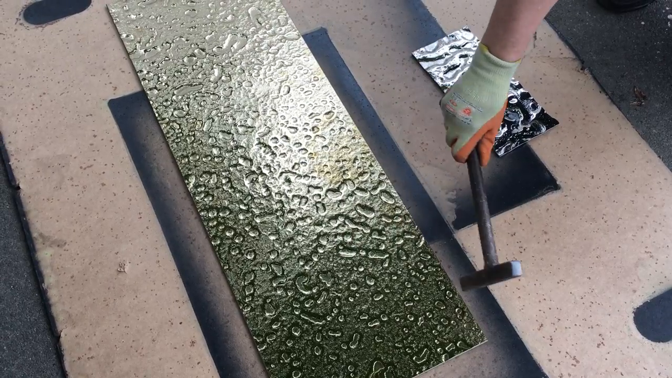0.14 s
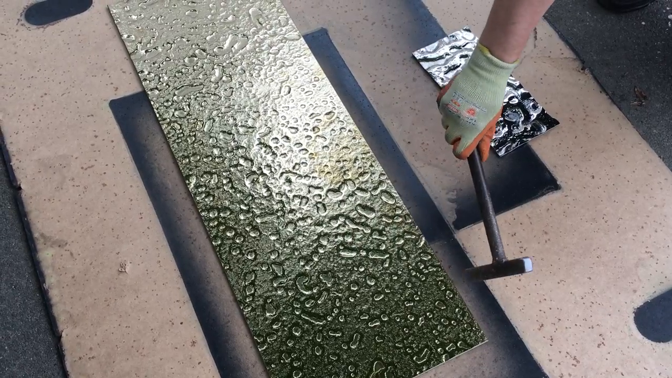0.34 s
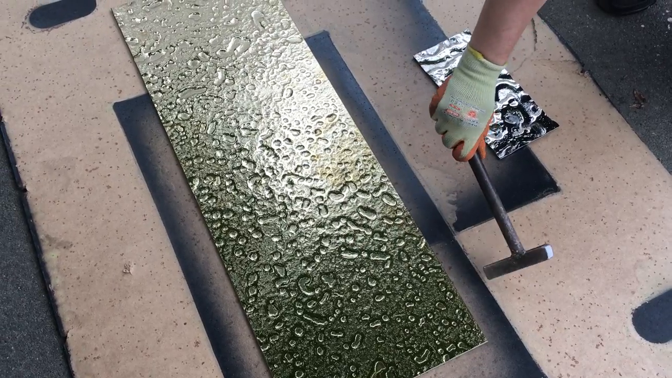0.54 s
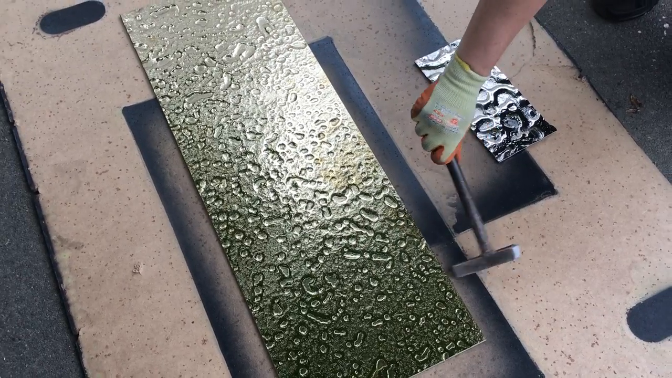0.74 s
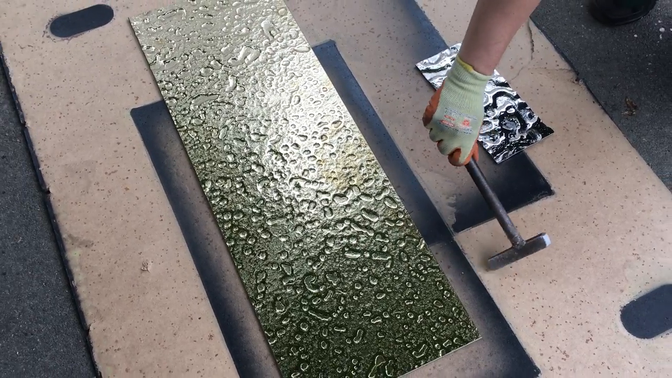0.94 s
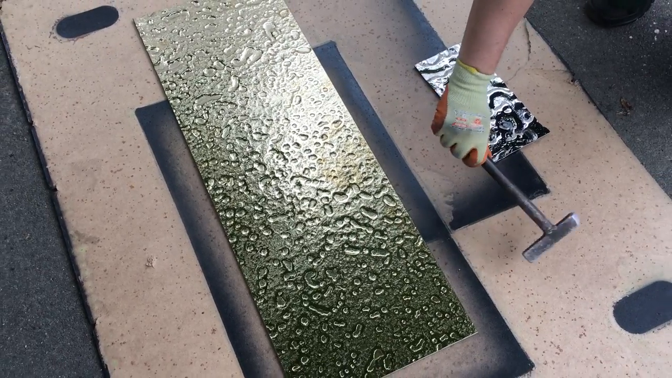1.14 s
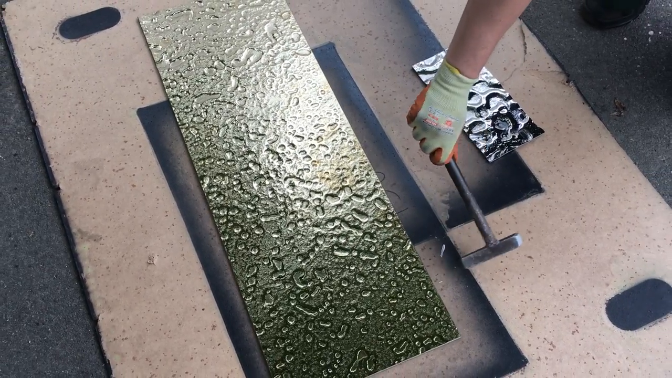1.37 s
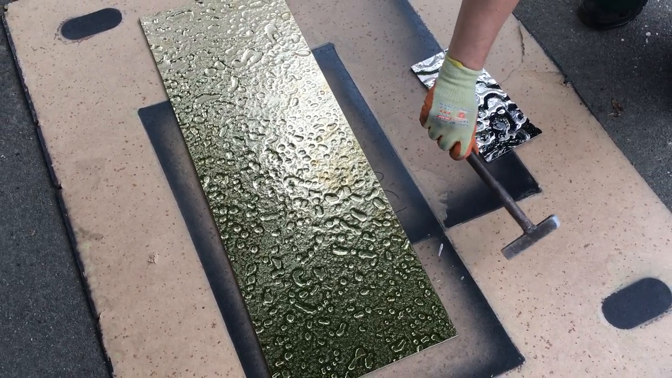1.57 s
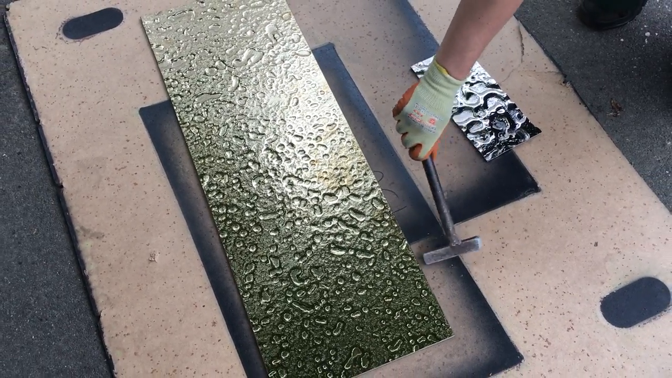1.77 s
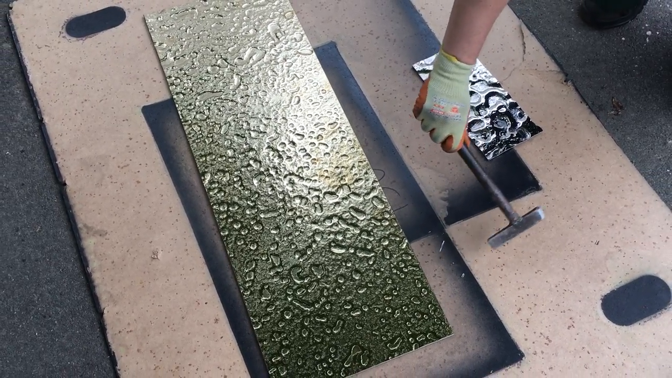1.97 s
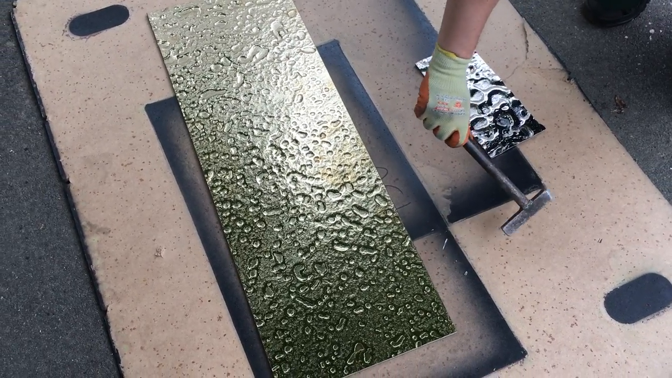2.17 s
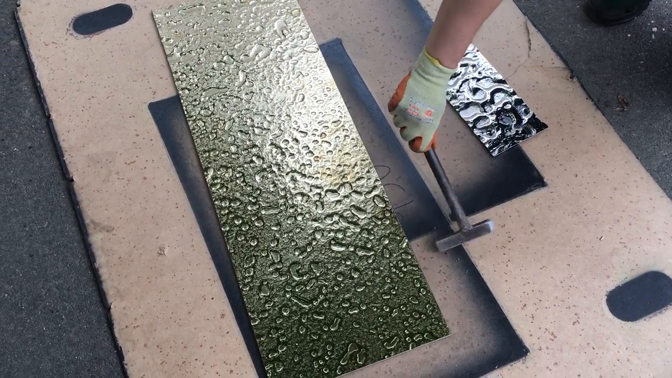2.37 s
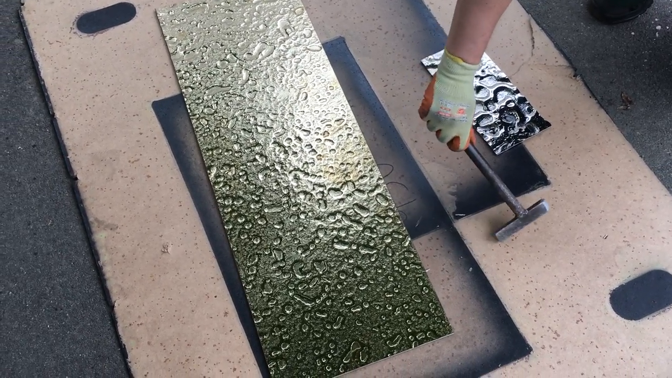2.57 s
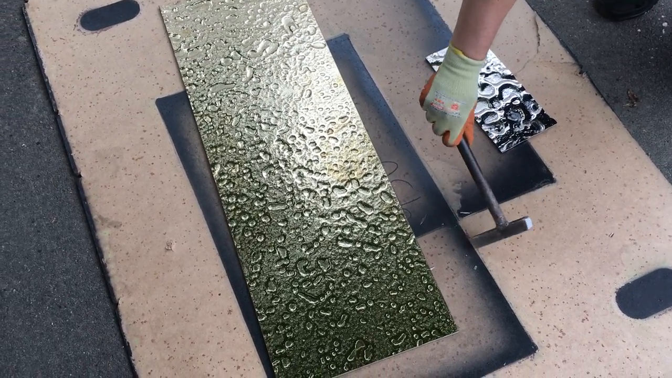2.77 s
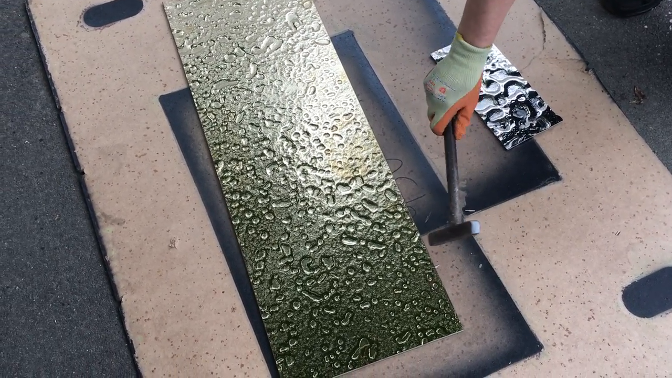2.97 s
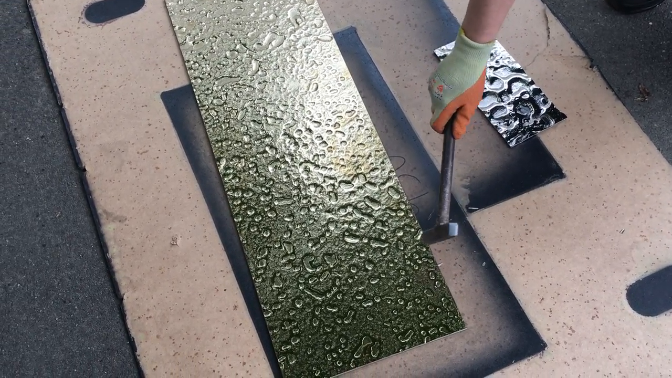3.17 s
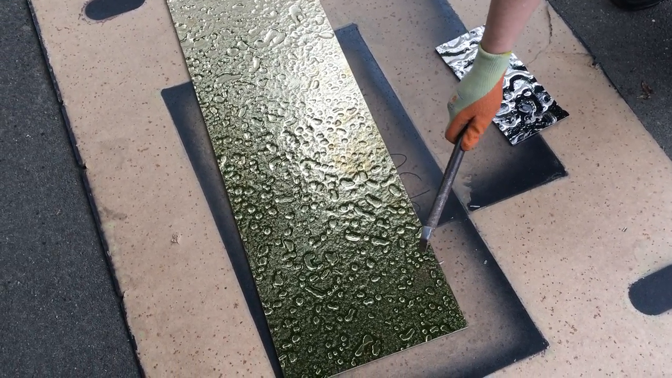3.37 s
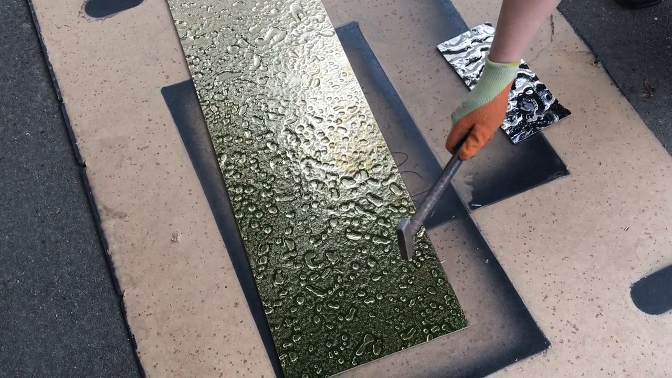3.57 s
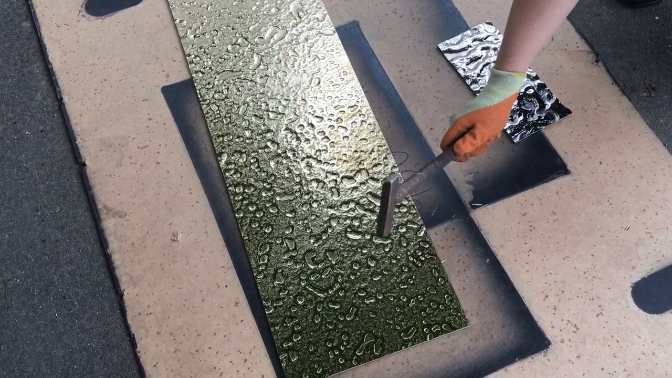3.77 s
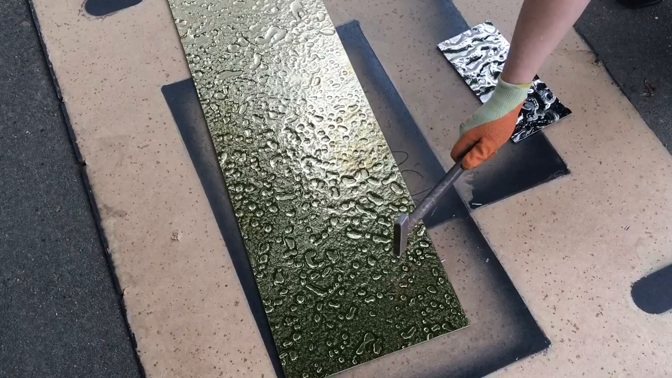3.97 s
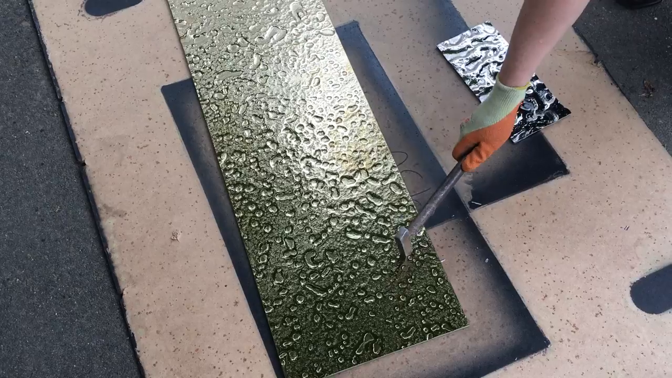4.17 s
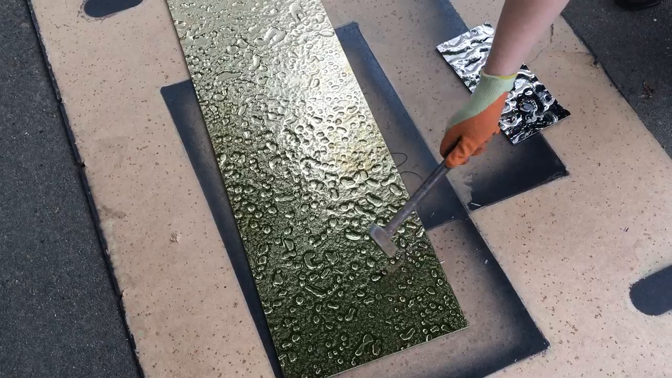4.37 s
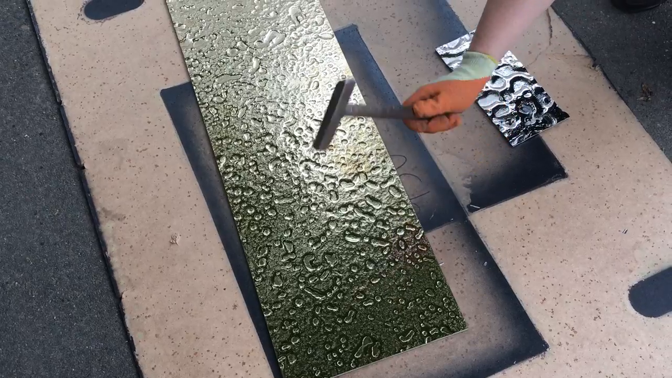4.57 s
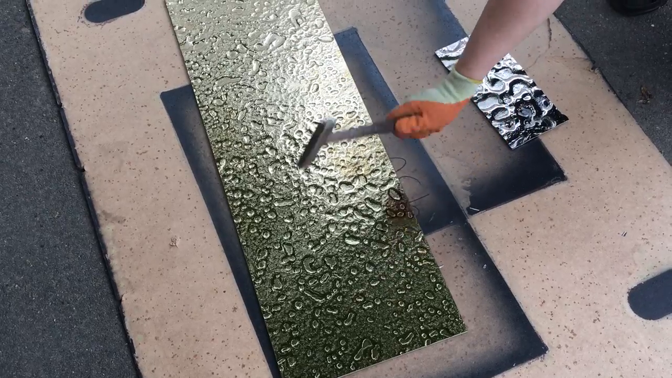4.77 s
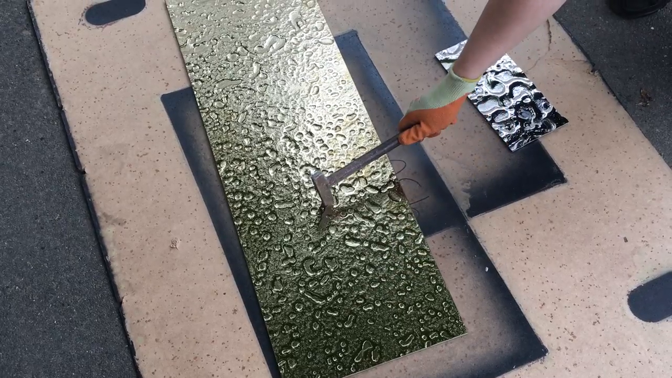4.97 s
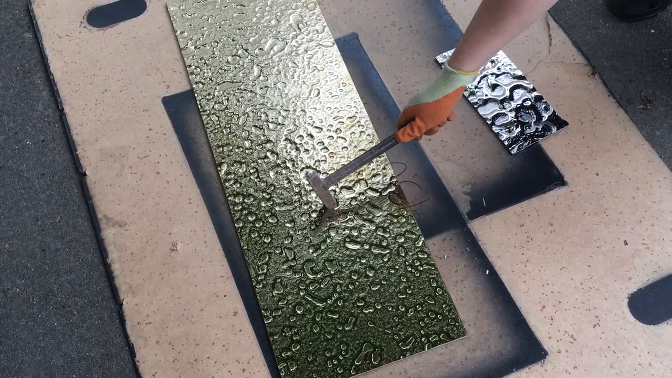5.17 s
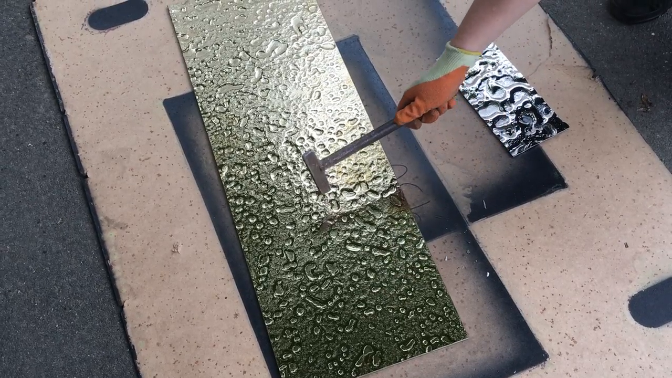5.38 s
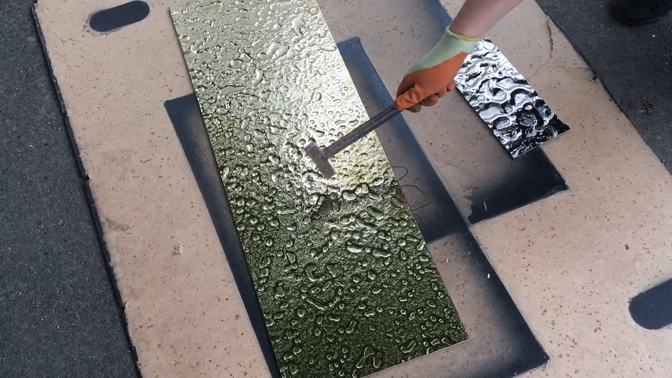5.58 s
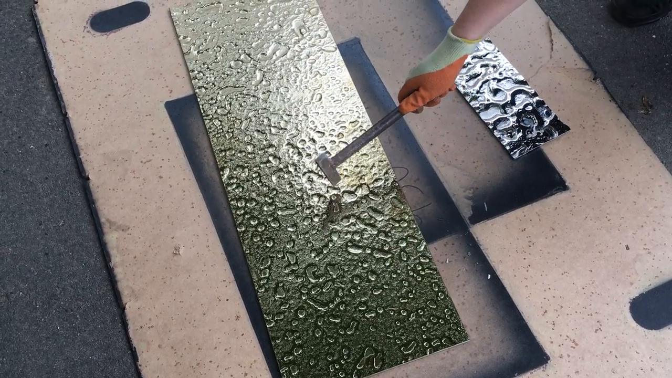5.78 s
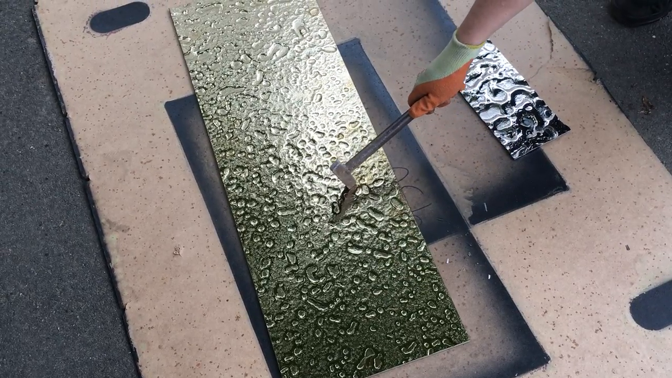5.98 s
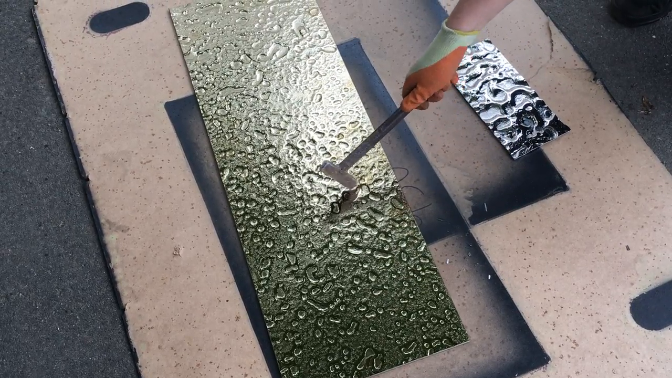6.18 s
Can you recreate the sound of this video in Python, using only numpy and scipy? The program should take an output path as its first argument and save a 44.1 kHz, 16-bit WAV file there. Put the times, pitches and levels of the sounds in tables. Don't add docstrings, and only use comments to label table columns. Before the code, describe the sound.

Seven hard hammer blows on glass in a yard, bright at first, then dull and crunchy, with chips ticking and a far engine humming.

```python
import sys
import numpy as np
from scipy import signal
from scipy.fft import rfft, irfft
from scipy.io import wavfile
from scipy.ndimage import uniform_filter1d, map_coordinates

SR = 44100
rng = np.random.default_rng(int(sys.argv[2]) if len(sys.argv) > 2 else 0)


def persist_wave(psi):
    counts = np.round(np.clip(psi, -1, 1) * 32767).astype(np.int16)
    wavfile.write(sys.argv[1], SR, np.atleast_2d(counts).T)


def boost(x):
    u = np.asarray(x, float) / 20
    return 10 ** u


N = 274302
T = np.arange(SR * 7 // 10) / SR

BLOW_S = [
    .8355,
    1.3222,
    1.8375,
    2.3922,
    4.1203,
    4.8978,
    5.9432,
]
# (yard under the blow [dB], far echo [dB], treble of the far echo [dB], gain dip [dB])
AFTER = [(-19, -44, -51, 4.5), (-15.5, -52, -56, 6), (-14.5, -52, -59.5, 4.5), (-15, -44.5, -45.5, 1.5),
         (-19.5, -72.5, -44.5, 6.5), (-26.5, -62, -50.5, 23), (-24, -48.5, -55, 4)]
# (frequency [Hz], level per Hz [dB])
FACE = [(160, -24.5), (280, 13), (1470, 1), (1990, -2.5), (3800, -13.5), (4810, -13.5), (6410, -9.5),
        (6980, -16), (9310, -19), (9790, -25), (12200, -25.5), (16000, -38.5)]
ECHO_T60, TREBLE_T60 = 0.59, 0.76
TREBLE_DIPS = 0.41


def unit(x):
    return x / np.sqrt(np.mean(x ** 2) + 1e-20)


def along(points, hz):
    f, v = np.transpose(points)
    return np.interp(np.log(hz + 1), np.log(f + 1), v)


def wobble(rate, size=N):
    knots = rng.standard_normal(int(size * rate / SR) + 4)
    return map_coordinates(knots, [np.arange(size) * rate / SR], order=1)


def noise(size, gain, peaky_db=0):
    mode_gap_hz, clear_from_hz, depth = 35, 3000, 1.6
    f = np.fft.rfftfreq(size, 1 / SR)
    crowd = np.minimum(wobble(SR * SR / size / mode_gap_hz, len(f)), 1.5) * f / (f + clear_from_hz)
    peaks = boost(peaky_db * (.5 * rng.standard_normal(len(f)) + depth * crowd))
    return unit(irfft(rfft(rng.standard_normal(size)) * peaks * gain(f), size))


def band(hz, width_hz):
    return lambda f: (f * width_hz / np.abs(hz * hz - f * f + 1j * f * width_hz)) ** 2


def dying(gain, decays, hold, scale, peaky_db):
    hz, t, z = signal.stft(noise(len(T), gain, peaky_db), SR, nperseg=128)
    fall = np.maximum(t - hold, 0) / (scale * along(decays, hz)[:, None])
    return signal.istft(z * boost(-60 * fall), SR, nperseg=128)[1][:len(T)]


def add(track, s, piece):
    place = track[round(s * SR):][:len(piece)]
    place += piece[:len(place)]


def fade(t60, attack=1e-5):
    return boost(-60 * T / max(t60, 1e-3)) * (1 - np.exp(-T / attack))


def thin(x, hz):
    return signal.sosfilt(signal.butter(4, hz, "high", fs=SR, output="sos"), x)


def dips():
    opening_db, fall_s, hold_s, recover_db_per_s = 13.5, 0.064, 0.25, 26.5
    t = np.arange(N) / SR
    dip_db = np.maximum(opening_db - recover_db_per_s * t, 0)
    for s, after in zip(BLOW_S, AFTER):
        back_db = recover_db_per_s * np.maximum(t - s - hold_s, 0)
        dip_db = np.maximum(dip_db, after[3] * np.clip((t - s) / fall_s, 0, 1) - back_db)
    return dip_db


def swollen(db, t60, column):
    delay_s, rise_s = 0.043, .04
    power = boost(2 * db)
    for s, after in zip(BLOW_S, AFTER):
        age = np.maximum(np.arange(N) / SR - s - delay_s, 0)
        echo = boost(after[column] - 60 * age / t60) * (1 - np.exp(-age / rise_s))
        power = power + echo ** 2
    return np.sqrt(power)


def nearness():
    # (time [s], level [dB])
    near = [(0, -2.5), (.8, -3), (1.6, 2.5), (2.5, 1), (3.3, 0.3), (4, -0.1), (4.75, 2), (5.5, 0.5),
            (6.22, 0)]
    s, db = np.transpose(near)
    return np.interp(np.arange(N) / SR, s, db)


def hiss():
    # (frequency [Hz], level per Hz [dB])
    hiss_colour = [(2500, -25), (3200, -0.5), (5000, -6.5), (7000, -12.5), (9500, -17.5), (10500, -22.5),
                   (15500, -24), (16500, -53.5)]
    level_db = -67.5 + 1.3 * nearness() - TREBLE_DIPS * dips()
    gain = swollen(level_db, TREBLE_T60, column=2)
    return boost(-3.5) * gain * noise(N, lambda f: boost(along(hiss_colour, f)))


def traffic():
    # (frequency [Hz], level per Hz [dB])
    traffic_colour = [(180, -29.5), (300, -5), (345, -8), (400, -16.5), (502, -13), (618, -8.5), (832, -12),
                      (1200, -13.5), (1820, -17), (3200, -26), (4160, -56.5), (7040, -120)]
    rush = noise(N, lambda f: boost(along(traffic_colour, f))) * boost(0.27 * wobble(6.8))
    level_db = -57.5 + 1.4 * nearness() - TREBLE_DIPS * dips()
    return rush * swollen(level_db, ECHO_T60, column=1)


def engine():
    # (frequency [Hz], level per Hz [dB])
    engine_colour = [(12, -48.5), (20, -24.5), (49, -2.5), (86, -0.5), (113, 0.5), (131, -11.5), (157, -9),
                     (214, -18.5), (338, -14.5), (390, -30.5), (450, -32.5), (580, -59.5), (990, -120)]
    # (frequency [Hz], width [Hz], level [dB])
    hum = [(122.76, 5.4, -5.5), (368, 7.6, -26.5), (579, 76, -21)]
    orders = sum(boost(db) * noise(N, band(hz, width_hz)) for hz, width_hz, db in hum)
    rumble = noise(N, lambda f: boost(along(engine_colour, f))) * boost(1.5 * wobble(7))
    return boost(-44 + nearness() - dips()) * (rumble + orders)


def squeal(grips, hz):
    bite_db_per_s, let_go_db_per_s, wander_hz = 650, 520, 5
    t = np.arange(N) / SR
    level_db = np.full(N, -140.)
    for s, length, db, change_db in grips:
        held = db + change_db * np.clip((t - s) / length, 0, 1)
        bite = bite_db_per_s * np.maximum(s - t, 0)
        let_go = let_go_db_per_s * np.maximum(t - s - length, 0)
        level_db = np.maximum(level_db, held - bite - let_go)
    pitch = hz + wander_hz * wobble(12)
    tone = np.sin(2 * np.pi * np.cumsum(pitch) / SR)
    return np.sqrt(2) * boost(level_db + 1.3 * wobble(30)) * tone


def brakes():
    # (start [s], length [s], level [dB], change over the grip [dB])
    first_grips = [(.15, .3, -85.5, -7), (.93, 0.072, -61, -14), (1.06, 0.2, -74.5, 1),
                   (1.345, 0.036, -40.5, -3), (1.42, 0.038, -38.5, -0.5), (1.47, 0.068, -46, 3),
                   (1.545, 0.15, -41, -5.5), (1.71, 0.088, -50.5, -4.5), (1.9, 0.14, -46.5, 3),
                   (2.06, 0.1, -43, 4), (2.17, 0.15, -42.5, -13), (2.345, 0.023, -57.5, -6),
                   (2.43, 0.046, -40.5, 4), (2.505, 0.029, -37, 0), (2.56, 0.09, -50.5, -4),
                   (2.66, 0.081, -48.5, -4), (2.77, 0.037, -54.5, 2), (2.845, 0.059, -48, 0.5),
                   (2.93, 0.3, -45, -18.5)]
    # (start [s], length [s], level [dB], change over the grip [dB])
    second_grips = [(2.65, 0.1, -74.5, 3), (2.925, 0.29, -73, 0), (3.34, 0.062, -78, -1.5),
                    (3.45, 0.24, -66, -8), (3.78, 0.062, -78, 3)]
    return squeal(first_grips, 5660) + squeal(second_grips, 4290)


def chips():
    # (time [s], level [dB], centre [Hz], width [Hz], t60 [s])
    ticks = [(1.5323, -58, 12900, 5000, 0.046), (1.6615, -59.5, 11800, 6000, 0.054),
             (1.723, -64, 11000, 6000, .04), (2.0487, -62, 8360, 3000, .04),
             (2.707, -50, 10700, 8000, 0.03), (2.765, -62, 8000, 8050, 0.034),
             (2.86, -74, 12000, 6070, 0.045), (2.9685, -58, 11700, 8050, .03),
             (3.0264, -55, 10600, 6000, 0.025), (3.0702, -56, 8950, 6000, 0.097),
             (3.1545, -63, 10800, 6000, .03), (3.219, -63, 12100, 5010, .03),
             (4.355, -58, 8800, 7850, 0.093), (4.6757, -45, 8500, 12100, 0.092),
             (4.675, -44.5, 2250, 1990, 0.059), (4.795, -55.5, 3970, 5900, 0.042),
             (4.865, -55, 5880, 5030, .03), (5.154, -66.5, 11200, 5100, 0.056),
             (5.89, -70, 11000, 5980, 0.024), (6.161, -69, 7000, 6080, 0.028),
             (6.1984, -60.5, 7500, 6960, 0.025)]
    out = np.zeros(N)
    for s, db, hz, width_hz, t60 in ticks:
        add(out, s, boost(db) * fade(t60, .0004) * noise(len(T), band(hz, width_hz), peaky_db=2.0))
    return out


def faint_rings():
    # (time [s], level [dB], frequency [Hz], t60 [s])
    shard = [(2.707, -63, 9420, .2), (3.027, -68, 9420, .18), (3.156, -68, 9420, .4),
             (3.22, -78, 11000, .15)]
    # (time [s], level [dB], frequency [Hz], t60 [s])
    pairs = [(2.43, -57, 2942, 1.1), (2.43, -61, 2953, 1.1), (2.43, -60, 3612, 1.0), (2.43, -64, 3621, 1.0)]
    out = np.zeros(N)
    for s, db, hz, t60 in shard + pairs:
        add(out, s, boost(db) * fade(t60) * np.sin(2 * np.pi * hz * T))
    return out


def rustles():
    rustle_s = [.784, 4.19, 4.3, 5.105, 5.105, 5.195, 5.28, 5.435, 6.0, 6.022, 6.06]
    # (length [s], level [dB], centre [Hz], width [Hz])
    scrapes = [(0.216, -46.5, 1300, 1700), (0.66, -62.5, 1940, 350), (0.34, -67, 5500, 3300),
               (0.18, -54, 1100, 2800), (0.32, -62, 3700, 5700), (.2, -55.5, 970, 2000),
               (0.34, -69.5, 3100, 3300), (.11, -56.5, 1040, 1200), (0.17, -63, 5200, 5000),
               (0.09, -51, 1100, 3500), (.12, -55, 800, 900)]
    out = np.zeros(N)
    for s, (length, db, hz, width_hz) in zip(rustle_s, scrapes):
        swell = np.sin(np.pi * np.clip(T / length, 0, 1) ** .45) ** 2
        grain = boost(db + 4.2 * np.clip(wobble(220, len(T)), -2, 1.5))
        rub = noise(len(T), lambda f: band(hz, width_hz)(f) / (1 + (f / 7500) ** 4))
        add(out, s, grain * swell * rub)
    return out


def bounces():
    # (time [s], level [dB], centre [Hz], width [Hz], t60 [s])
    knocks_around = [(4.141, -9.5, 2270, 1210, 0.034), (4.166, -22, 1870, 1800, 0.1),
                     (4.221, -32.5, 1900, 1510, 0.023), (4.923, -17.5, 3200, 1400, 0.029),
                     (4.934, -6, 2220, 880, 0.021), (4.956, -32, 2063, 2500, 0.042),
                     (.923, -37.5, 1400, 889, 0.1), (2.5, -47, 1700, 2400, 0.067),
                     (2.7595, -46, 680, 500, 0.13), (2.47, -36, 1400, 120, .1), (2.528, -39, 900, 1800, .04),
                     (1.375, -36, 2300, 500, .05), (4.124, -18.5, 1030, 860, 0.088),
                     (4.905, -19.5, 1100, 450, 0.072), (1.838, -16, 2350, 400, .04),
                     (1.842, -21.5, 397, 95, 0.09), (.852, -22, 660, 610, 0.066),
                     (5.945, -23, 286, 87, 0.092), (4.187, -31, 970, 1200, .03),
                     (4.275, -47, 1800, 540, 0.046), (4.108, -29, 2800, 600, .03),
                     (4.8772, -21, 1900, 3000, .012), (5.921, -46, 2600, 500, .03),
                     (5.932, -44, 2600, 600, .03), (2.5, -51, 2200, 2500, .05),
                     (4.942, -17, 1100, 2500, 0.027), (5.952, -17.5, 830, 440, 0.046),
                     (5.965, -24.5, 640, 500, 0.049)]
    out = np.zeros(N)
    for s, db, hz, width_hz, t60 in knocks_around:
        add(out, s, boost(db) * fade(t60, 0.00078) * noise(len(T), band(hz, width_hz)))
    return out


def swells():
    # (end [s], level [dB], frequency [Hz], rise [s])
    bends = [(1.3189, -24, 2850, 0.0022), (4.12, -29, 2996, 0.005), (4.8971, -2.5, 497, 0.0049),
             (4.8974, -11, 3080, 0.0062), (5.9415, -24, 464, 0.0024), (0.8364, -35, 450, 0.015)]
    out = np.zeros(N)
    until_end = T[:SR // 40] - T[SR // 40]
    for end, db, hz, rise in bends:
        tone = np.sin(2 * np.pi * hz * until_end)
        add(out, end + until_end[0], boost(db) * np.exp(until_end / rise) * tone)
    return out


def lead_ins():
    # (time [s], thud [dB], thud [Hz], fizz [dB], fizz length [s])
    lead_in_thuds = [(0.772, -31.5, 487, -49.5, 0.2), (1.2998, -17, 414, -40, 0.018),
                     (1.8165, -11.5, 323, -36, 0.014), (2.365, -17.5, 308, -33, 0.039),
                     (4.0978, -36, 2480, -40.5, 0.026), (4.8764, -25, 2540, -28, 0.018),
                     (5.922, -56, 2600, -58, 0.018)]
    out = np.zeros(N)
    for s, thud_db, hz, fizz_db, length in lead_in_thuds:
        t60 = max(18 / hz, 0.029)
        sweep = hz * (T + 0.0034 * (1 - np.exp(-T / 0.00095)))
        thud = np.sin(2 * np.pi * sweep)
        thud += 0.89 * noise(len(T), band(1.6 * hz, 2.0 * hz))
        thud += 0.85 * np.sin(2 * np.pi * 0.83 * hz * T)
        fizz = noise(len(T), lambda f: boost(along(FACE, f))) * (T < length)
        add(out, s, boost(thud_db) * fade(t60, 0.00076) * thud + boost(fizz_db) * fizz)
    return out


def contacts():
    return thin(lead_ins() + swells() + bounces() + rustles(), 200)


def spot(modes, db, steady_s, wall_db):
    # (frequency [Hz], level [dB])
    wall_modes = [(740, 0), (1370, 0.0043)]
    wall_s, wall_t60 = .082, 0.14
    t = T[:SR // 4]
    age, late = np.maximum(t - steady_s, 0), np.maximum(t - wall_s, 0)
    ring = 0
    for hz, level_db, t60 in modes:
        decay_db = 60 * age / np.clip(t60, .02, .06)
        ring = ring + boost(db + level_db - decay_db) * np.sin(2 * np.pi * hz * t)
    slap = sum(boost(wall_db + level_db) * np.sin(2 * np.pi * hz * t) for hz, level_db in wall_modes)
    slap = slap * boost(-60 * late / wall_t60) * (1 - np.exp(-(late / 0.0075) ** 2))
    return ring * (1 - np.exp(-t / .001)) + slap


def ringing(lines, modes, k, linger_db, steady_s, damping):
    # (frequency [Hz], level [dB], t60 [s])
    linger = [(1300, -29.5, .3), (1445, -5, 0.28), (1601, -20, 0.46), (2700, -10, .5), (2942, 5, 0.72),
              (3612, 8, 1), (4492, 1, 1.1), (5249, -2.5, .65), (7077, -7.5, .55), (7913, -6.5, .6),
              (8545, 3, 0.9), (9577, -7, .5), (11000, -10, .45)]
    twin_hz, third_share = 4.8, .4
    choke_hz, choke_s, choke_db_per_s = 1445, 0.11, 600
    twin = np.exp(2j * np.pi * twin_hz * T)
    throb = twin * (1 + third_share * twin ** 2)
    age = 0.11 * np.minimum(T, steady_s) + damping * np.maximum(T - steady_s, 0)
    ring = 0
    for hz, mode in zip(lines, modes):
        extra_db, t60 = (along(np.array(linger)[:, [0, c]], hz) for c in (1, 2))
        tail = boost(linger_db + extra_db + 2.6 * wobble(35, len(T))) * fade(t60)
        body = boost(-60 * age / min(mode[0], .5, 1500 / hz) + wobble(60, len(T)))
        choked = abs(hz - choke_hz) < 80
        body = body * boost(-choke_db_per_s * np.maximum(T - choke_s, 0) * choked)
        turn = np.exp(2j * np.pi * (hz * T + rng.random()))
        ring += boost(mode[k]) * np.imag(turn * (body + tail * throb))
    return ring


def blows():
    # (head [dB], head [Hz], boards [dB], air puff [dB], top octave [dB])
    knocks = [(-9, 1950, -20, -48, -4.5), (-9.5, 1200, -19, -32.5, -1), (-11, 2000, -23, -26, 1),
              (-13.5, 2400, -22.5, -34.5, 4), (-10, 2100, -19, -43.5, -3.5), (-10.5, 2100, -13, -14, 0.5),
              (-10.5, 2480, -35, -43.5, -4)]
    # (level [dB], steady length [s], decay scale [1], brightness [dB/octave], lingering ring [dB])
    bodies = [(-17, 0.011, 1.18, -0.5, -36.5), (-15.5, 0.0099, 1.14, 2.5, -31.5),
              (-16, 0.014, 0.89, 1.5, -41), (-15.5, 0.012, 0.9, 0.5, -35.5), (-14.5, 0.014, 1.33, 3, -40),
              (-16, 0.031, 1.98, 3, -51.5), (-15.5, 0.0075, 0.93, 2.5, -50)]
    # (spot modes [dB], clack between 1 and 4 kHz [dB], near wall [dB])
    spot_levels = [(-22, -1.5, -36), (-22, -3, -34), (-23.5, -4.5, -37), (-24, -4, -37), (-19, -3, -41.5),
                   (-20, -5.5, -45), (-17.5, -3, -41.5)]
    boards_from_hz = [238, 215, 205, 200, 139, 130, 225]
    whole_hz = [355, 554, 1445, 2662, 2942, 3612, 4492, 5249, 6172, 6519, 6786, 7077, 7682, 7913, 8416,
                8545, 9085, 9577, 10970, 11258, 12450, 13230, 14020, 14790, 730, 845]
    # (t60 [s], level in each of the four edge blows [dB])
    whole = [(0.23, -22.5, -20.5, -25, -24), (0.17, -17, -17.5, -22, -23), (0.45, -36, -18, -25.5, -28.5),
             (0.23, -42.5, -36, -38.5, -23.5), (0.22, -49, -27.5, -32, -23), (0.27, -38, -35.5, -38, -27),
             (0.16, -30, -17, -11, -6), (0.11, -36, -24, -33.5, -18), (0.037, -13.5, -20, -24, -21),
             (0.064, -34, -29.5, -26, -38.5), (0.087, -36.5, -34.5, -19.5, -28),
             (0.13, -31, -12.5, -10.5, -15.5), (0.09, -28.5, -15, -15, -17.5), (0.12, -35, -32, -24, -12.5),
             (0.15, -32.5, -29.5, -31, -15.5), (0.11, -49.5, -28.5, -35.5, -45),
             (0.14, -47.5, -36, -48.5, -34), (0.16, -34.5, -26.5, -30, -18), (0.11, -56, -37.5, -27.5, -33),
             (0.16, -42, -32.5, -29.5, -28.5), (0.1, -50.5, -60.5, -46, -37),
             (0.12, -58.5, -35, -40, -30.5), (0.14, -45, -51, -40.5, -52), (0.13, -72.5, -52, -55, -45),
             (0.15, -29, -23.5, -23, -22), (0.066, -10, -20, -28, -28.5)]
    cracked_hz = [361, 840, 1254, 1960, 2580, 4506, 5604, 6191, 6546, 7372, 8021, 8370, 9020, 9720, 10420,
                  11930, 13490]
    # (t60 [s], level in each of the three face blows [dB])
    cracked = [(0.15, -12, -23, -8), (0.27, -27.5, -30, -17), (0.25, -22, -30, -26),
               (0.21, -16, -19.5, -39.5), (0.26, -28, -26.5, -31), (0.16, -18.5, -22.5, -24.5),
               (0.46, -27.5, -27, -32), (0.21, -17, -16.5, -34), (0.12, -29, -16.5, -41),
               (0.12, -16.5, -25, -44.5), (0.23, -19, -25, -52), (0.13, -24, -20, -43),
               (0.17, -31, -12.5, -30), (0.191, -32, -30.5, -32), (0.25, -57, -27.5, -58),
               (0.26, -38.5, -26.5, -53), (0.031, -42.5, -23, -63)]
    # (frequency [Hz], level per Hz [dB])
    edge = [(150, -33), (250, -11.5), (831, 11.5), (1040, 5.5), (2860, 0), (3840, -7.5), (4490, -3.5),
            (4820, -6.5), (6940, -1.5), (9830, -11.5), (10400, -20.5), (16000, -33)]
    # (frequency [Hz], t60 [s])
    clack_decay = [(100, 0.09), (400, 0.099), (1500, 0.11), (4000, .09), (9000, 0.083), (15000, 0.061)]
    # (frequency [Hz], t60 [s])
    yard_decay = [(150, 0.19), (700, 0.41), (2500, 0.56), (6000, 0.27), (10000, 0.24), (15000, 0.25)]
    # (frequency [Hz], level [dB], t60 [s])
    spot_1 = [(810, 0, 0.2), (1247, 2, 0.14), (2589, -5, 0.054), (2800, -13, 0.07), (3100, -6.5, 0.064),
              (3647, -5.5, 0.044)]
    # (frequency [Hz], level [dB], t60 [s])
    spot_2 = [(789, -26, 5.0), (1230, -4.5, 0.22), (1454, -2, 0.77), (2260, -0.5, 0.032), (3270, -9, 0.14),
              (4140, -6, 0.051)]
    # (frequency [Hz], level [dB], t60 [s])
    spot_3 = [(765, -2, 5.0), (1220.4, -2.5, 0.11), (1420, -9, 5.0), (1826, -1, 0.13), (2990, -2, 0.096),
              (3634, -16.5, 0.23)]
    # (frequency [Hz], level [dB], t60 [s])
    spot_4 = [(764, -1, 0.39), (1270, -1, 0.09), (1554, -1.2, 0.11), (2630, -2, 0.31), (2960, -2.5, 0.23),
              (3590, -2.9, 0.14)]
    # (frequency [Hz], level [dB], t60 [s])
    spot_5 = [(1240, -9.5, 0.92), (1972, -1.5, 0.19), (2540, -17, 0.62), (4495, -9, 0.16), (5636, -3, 0.23),
              (6110, -0.5, 0.11), (6720, -2.5, 0.027)]
    # (frequency [Hz], level [dB], t60 [s])
    spot_6 = [(5450, -3.5, 0.17), (6298, -12, 5.0), (6535, 0, 0.5), (7730, -9.5, 0.09), (8366, -10.5, 5.0)]
    # (frequency [Hz], level [dB], t60 [s])
    spot_7 = [(835.5, -9, 0.15), (1238, 3, 0.067), (2540, -6, 0.069), (4102, -21, 0.15), (4990, -21, 0.081),
              (5700, -12, 0.075), (6160, -16, 0.078), (6526, -12, 0.056)]
    spots = [spot_1, spot_2, spot_3, spot_4, spot_5, spot_6, spot_7]
    haze_db = -1.5
    out = np.zeros(N)
    for i, s in enumerate(BLOW_S):
        if i < 4:
            spectrum, lines, modes, k, damping = edge, whole_hz, whole, i + 1, 1
        else:
            spectrum, lines, modes, k, damping = FACE, cracked_hz, cracked, i - 3, 1.9
        head_db, head_hz, boards_db, puff_db, top_db = knocks[i]
        db, steady_s, scale, tilt_db, linger_db = bodies[i]
        spot_db, mid_db, wall_db = spot_levels[i]

        def colour(f):
            return boost(along(spectrum, f) + tilt_db * np.log2(f / 2000 + 1e-3) + top_db * (f > 10200))

        def clack_colour(f):
            return colour(f) * boost(mid_db * band(2000, 4000)(f) + haze_db * (f > 4300))

        clack = dying(clack_colour, clack_decay, steady_s, scale, peaky_db=9 / damping ** .5)
        yard = dying(colour, yard_decay, 0.034, scale, peaky_db=7 / damping)
        yard = boost(AFTER[i][0]) * yard * (1 - np.exp(-T / 0.016))
        rise = 1 - np.exp(-(T / (0.0026 + 0.5 * steady_s)) ** 2)
        ring = boost(-3.5) * rise * ringing(lines, modes, k, linger_db, steady_s, damping)
        head = boost(head_db) * fade(0.045) * noise(len(T), band(head_hz, 1300))
        boards = boost(boards_db) * fade(0.18, 0.0037) * noise(len(T), band(280, 100))
        puff_cycles = 38 * T + 1.5 * (1 - np.exp(-T / 0.0083))
        puff = boost(puff_db) * fade(0.18, 0.0089) * np.sin(2 * np.pi * puff_cycles)
        struck = boost(db) * (clack + yard) + ring + head + boards
        add(out, s, thin(struck, boards_from_hz[i]) + puff)
        add(out, s, spot(spots[i], spot_db, steady_s, wall_db))
    return out


def scene():
    background = hiss() + traffic() + engine() + brakes()
    return (background + chips() + faint_rings() + contacts() + blows())[None]


def squeal_shadow(x, margin_db, slope_db):
    line_hz = 5655
    hz, _, z = signal.stft(x, SR, nperseg=1024)
    power = np.abs(z) ** 2
    line = power[:, np.abs(hz - line_hz) < 60].max(axis=1, keepdims=True)
    away = np.where(hz > line_hz, hz - line_hz, 1.6 * (line_hz - hz))[:, None] / 1000
    shadow = line * boost(2 * (margin_db - slope_db * away)) * (hz[:, None] > 4650)
    local = np.abs(uniform_filter1d(uniform_filter1d(power, size=7, axis=1), size=3, axis=2))
    kept = z / (1 + (shadow / (local + 1e-20)) ** 4)
    return signal.istft(kept, SR, nperseg=1024)[1][:, :N]


def low_pass(x):
    return signal.sosfilt(signal.butter(12, 16630, fs=SR, output="sos"), x)


def record(dry):
    x = dry / (1 + np.abs(dry / .74) ** 4) ** (1 / 4)
    hz = np.fft.rfftfreq(N, 1 / SR)
    x = irfft(rfft(x) * boost(-22 * np.clip((hz - 15750) / 150, 0, 1)), N)
    mix = squeal_shadow(x, margin_db=-33.5, slope_db=5.5)
    return low_pass(mix)


dry = scene()
out = record(dry)
persist_wave(out)
```